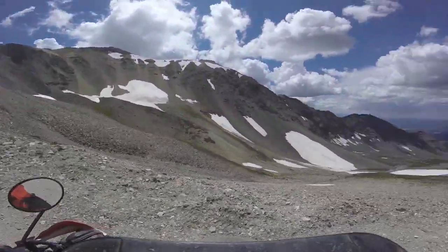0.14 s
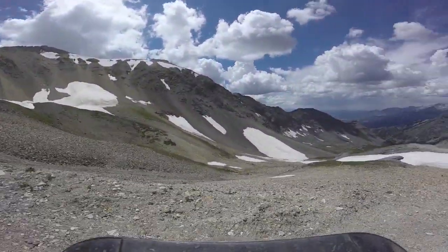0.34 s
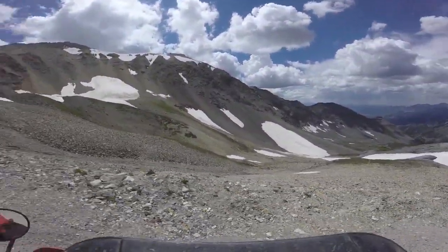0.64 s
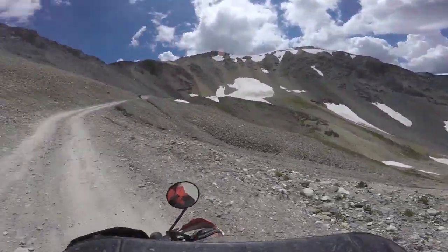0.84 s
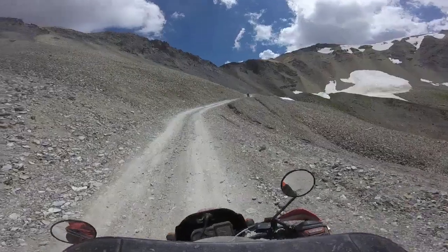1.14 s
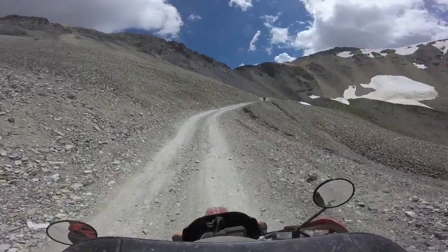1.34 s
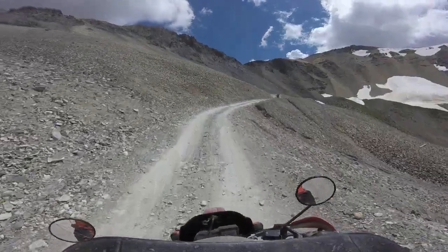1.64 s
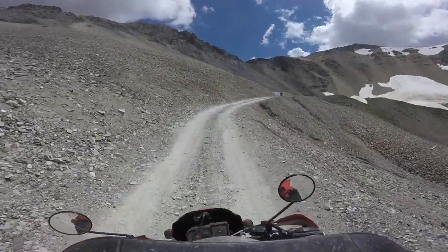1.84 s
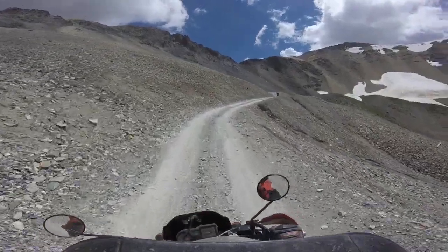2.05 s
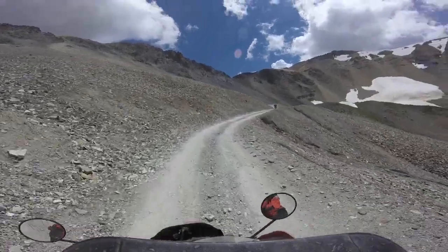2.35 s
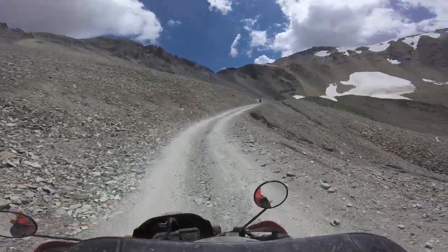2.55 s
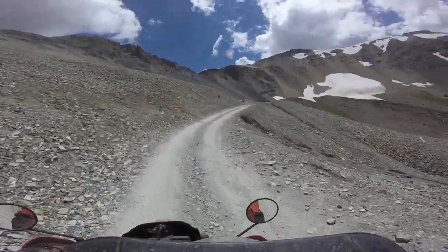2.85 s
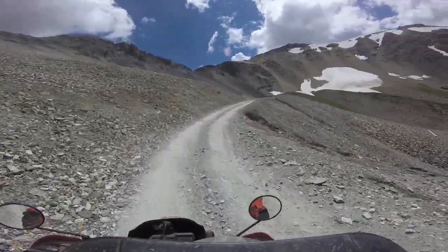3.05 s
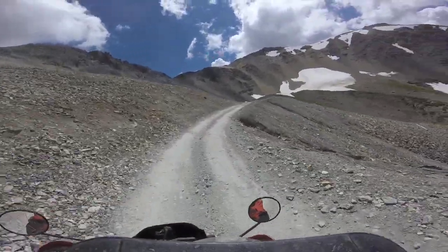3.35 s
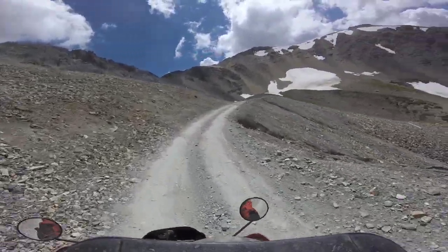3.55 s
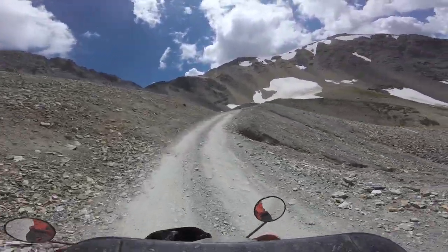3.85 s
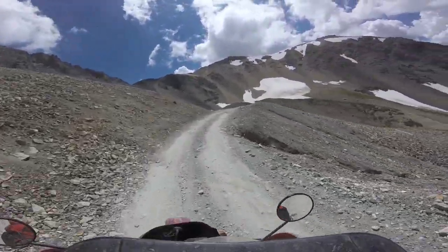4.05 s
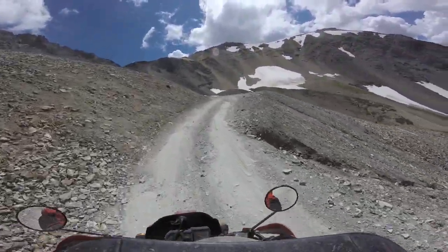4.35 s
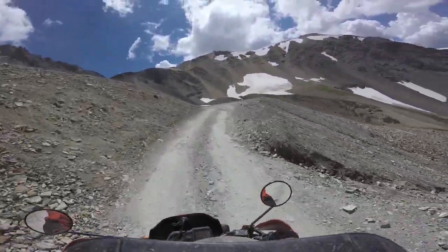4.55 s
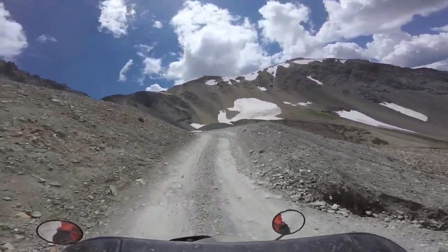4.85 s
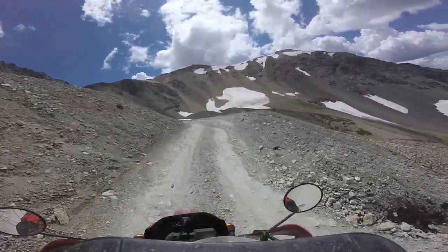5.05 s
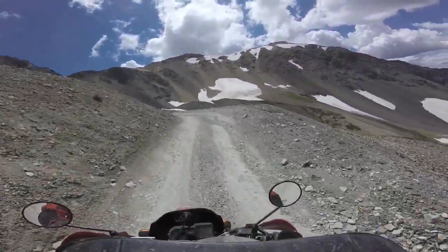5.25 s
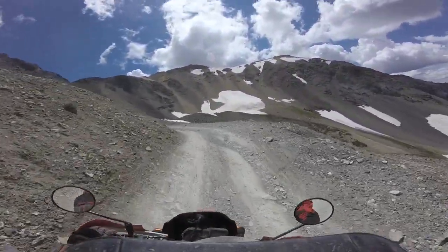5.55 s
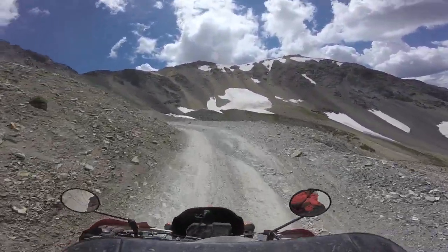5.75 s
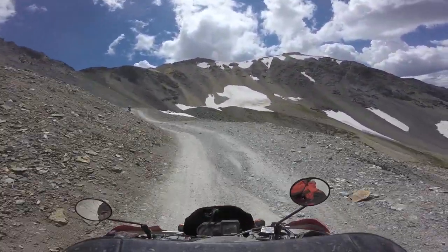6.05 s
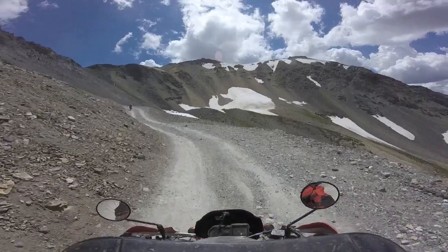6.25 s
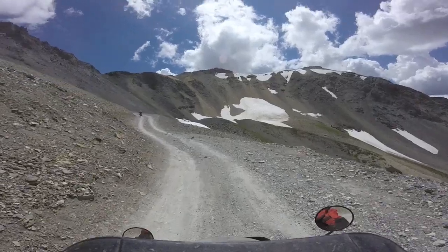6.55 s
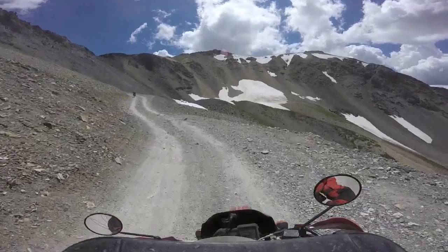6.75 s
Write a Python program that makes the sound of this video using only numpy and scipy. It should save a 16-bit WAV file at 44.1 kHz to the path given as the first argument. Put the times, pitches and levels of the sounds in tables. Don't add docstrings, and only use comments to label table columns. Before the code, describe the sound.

Close, slightly muffled helmet microphone outdoors: a double knock and rattle open over a steady throaty motorcycle engine. The tone shifts briefly as the head turns aside, then the engine pulls harder, wavering as the wheel slips. Gravel hiss, bursts of sprayed stones and low wind thrums run throughout, with sparse dry ticks. Finally stones crunch strongly and the engine slows, weakens and stumbles.

```python
import sys
import numpy as np
from scipy import signal
from scipy.io import wavfile
from scipy.ndimage import uniform_filter1d

SR = 44100
rng = np.random.default_rng(int(sys.argv[2]) if len(sys.argv) > 2 else 0)


def wrap_up_sound(samples):
    columns = np.atleast_2d(samples).T
    tamed = np.clip(columns, -1, 1)
    steps = np.round(tamed * 32767).astype(np.int16)
    wavfile.write(sys.argv[1], SR, steps)


def undo_db(level):
    steps = np.asarray(level, float) / 20
    return 10 ** steps


N = 304290
T = np.arange(N) / SR
FULL_LOAD_DB = -26

# t/s, firing rate/Hz
SPEED = [(0.0, 29.917), (0.5, 27.815), (1.0, 31.417), (1.9, 30.411), (2.3, 31.372), (2.6, 33.267),
         (3.3, 32.279), (3.9, 30.411), (4.4, 29.107), (4.9, 31.418), (5.4, 29.565), (6.2, 28.546),
         (6.45, 25.987), (6.7, 24.894), (6.9, 21.153)]
# t/s, silencer ring level/dB
LOAD = [(0, -33), (1.0, -31), (1.27, -28), (1.5, -32), (1.65, -29.5), (2.05, -25), (2.65, -26),
        (3.55, -28.5), (3.85, -33), (4.03, -31), (4.16, -39), (4.32, -32.5), (4.72, -28.5), (5.12, -35.5),
        (5.35, -31.5), (5.9, -32.5), (6.25, -38.5), (6.9, -56)]
# t/s, share/1
TURN = [
    (0, 0.14),
    (.11, 0.26),
    (.2, 0.82),
    (.55, 1),
    (.86, 0.54),
    (.98, 0.15),
    (6.9, 0.0044),
]


def engine():
    first_turn = .3114 - .03
    speed_hz = firing_rate()
    turns = np.cumsum(speed_hz) / SR - first_turn
    at = np.flatnonzero(np.diff(np.floor(turns)) > 0)
    stumble = np.maximum(27.5 - speed_hz[at], 0)
    jitter_s = .0011 * stumble * rng.standard_normal(len(at))
    at = np.minimum(at + np.round(SR * jitter_s).astype(int), N - 1)
    lag_s = abs(0.001085 + .00006 * rng.standard_normal(len(at)))
    late = at + np.round(SR * lag_s).astype(int)
    per_cycle = np.sqrt(SR / 30)
    exhaust = exhaust_pipe(at, stumble) + silencer(at, late) + outlet_jet(at, late)
    return per_cycle * exhaust + valve_gear(turns) + frame_hum(turns)


def firing_rate():
    spread_s = .05
    # t/s, firing rate gained/Hz
    slips = [(0.45, 1.33), (0.74, -0.6), (0.87, -1.58), (0.99, -1.88), (1.17, -1.28), (1.27, -1.78),
             (1.56, -1.96), (1.85, -0.61), (2.46, 1.34), (2.69, -1.05), (3.01, -1.15), (3.31, -0.7),
             (3.86, 2.15), (4.12, 2.61), (4.48, 0.71), (4.9, -1.31), (5.05, 0.94), (5.23, -0.61),
             (5.3, -0.52), (5.54, 1.34)]
    return curve(SPEED) + sum(gain * np.exp(-.5 * ((T - s) / spread_s) ** 2) for s, gain in slips)


def pipe_db():
    full_db, share, lag_s = -33, 0.38, .3
    bog_gain_db = np.maximum(25 - curve(SPEED), 0)
    slow_load_db = uniform_filter1d(curve(LOAD) - FULL_LOAD_DB, round(lag_s * SR), mode="nearest")
    return full_db + bog_gain_db + share * slow_load_db


def exhaust_pipe(at, stumble):
    # f/Hz, width/Hz, level/dB, polarity at the outlet/1
    pipe_modes = [(130, 44, -5, 0.013), (158.8, 41.4, 0.5, -0.77), (264.9, 21.2, -2, -1.17),
                  (295, 44.6, 2, -0.74), (442.6, 60.6, 4.5, -0.61), (631.3, 28, -10.5, 0.8),
                  (828, 69, -1.5, 0.83)]
    push = np.zeros(N + 200)
    weak_db = -.6 * stumble * abs(rng.standard_normal(len(at)))
    push[at] = undo_db(pipe_db()[at] + weak_db)
    t = T[:200]
    pipe = signal.fftconvolve(rings(pipe_modes), t * np.exp(-t / 0.00012))
    return undo_db(-0.5) * strike(push, pipe)


def silencer(at, late):
    # f/Hz, width/Hz, level/dB, polarity/1
    shell_modes = [(1249.6, 171, 2, 0.89), (1357.6, 73, -4, -1.144), (1558, 94, -9, -0.96),
                   (1549, 71, -5, 1), (1570, 110, -8.5, -1.1)]
    turn = curve(TURN)
    blow = np.zeros(N + 200)
    ring_db = (curve(LOAD) - 4 * turn)[at]
    blow[late] = undo_db(ring_db + 0.13 * rng.standard_normal(len(at)))
    blow[late + 100] = -turn[at] * blow[late]
    direct = rings(shell_modes)
    answer = direct.copy()
    answer[268:] += 0.082 * direct[:-268]
    flow = strike(blow, exhaust_gate()) * rng.standard_normal(N)
    shaken = strike(flow, rings([(1324, 37.5, 0, 1)]))
    return undo_db(-0.5) * strike(blow, answer) + undo_db(-11.0) * shaken


def outlet_jet(at, late):
    # f/Hz, width/Hz, level/dB
    jet_modes = [(1618, 267, -8), (1922, 125, -0.5), (2332, 162, -4), (2985, 246, -12.5),
                 (3820, 250, -17.5), (4440, 330, -25.5), (6180, 780, -21)]
    full_db, load_share, aside_db = -36, .7, 5
    puff_db = full_db + load_share * (curve(LOAD) - FULL_LOAD_DB) + aside_db * curve(TURN)
    puff = np.zeros(N + 200)
    puff[late] = undo_db(puff_db[at] + 0.8 * rng.standard_normal(len(at)))
    flow = strike(puff, exhaust_gate()) * rng.standard_normal(N)
    outlet = rings([(hz, width, db + 20 * np.log10(width), (-1) ** k)
                    for k, (hz, width, db) in enumerate(jet_modes)])
    t = T[:60]
    outlet = signal.fftconvolve(outlet, t * np.exp(-t / .00003))
    return undo_db(-1.5) * strike(flow, outlet)


def exhaust_gate():
    t = T[:2048]
    return (1 - np.exp(-t / 0.00053)) * (np.exp(-t / 0.0058) + 0.076 * np.exp(-t / 0.0031))


def valve_gear(turns):
    # f/Hz, density/dB
    whirr = [(1500, -32.5), (3500, -8.5), (4500, 2), (5300, -1), (6200, 5), (7000, -4), (9000, -5.5),
             (10000, -15), (12500, -22.5), (15000, -36.5), (16000, -62)]
    level_db = -52.5 + 0.87 * (pipe_db() + 29)
    cycle = turns % 1
    slow = 0.85 * np.exp(-cycle / 0.85)
    quick = (0.64 + 1.4 * curve(TURN)) * np.exp(-cycle / 0.085)
    swell = .5 + (1 - np.exp(-cycle / 0.018)) * (slow + quick)
    return undo_db(level_db) * swell * noise(whirr, size=256, patchy_db=3.5, bins=4, frames=6)


def frame_hum(turns):
    # t/s, level/dB, spread/s
    hum = [
        (.8, -47.5, .5),
        (1.85, -41.5, 0.31),
        (2.68, -44.5, 0.25),
        (4.4, -47.5, 0.11),
        (5.3, -52.5, .45),
    ]
    return swells(hum) * np.sqrt(2) * np.sin(2 * np.pi * (8 * turns + 0.52))


def gravel():
    # f/Hz, density/dB
    rolling = [(80, -10), (150, -14), (300, 5), (700, -13), (1000, -3), (1330, 6.5), (1700, -0.5),
               (2200, 0), (2600, -12), (3500, -34.5), (5000, -49), (9000, -104)]
    # f/Hz, density/dB
    hiss = [(900, -29), (1350, 16), (1900, 9.5), (2550, 10), (3000, 10), (3750, 3.5), (4200, -8.5),
            (5300, -22.5), (6300, -4), (7200, -20.5), (9500, -34), (12000, -54.5), (15000, -88)]
    # t/s, level/dB, spread/s
    stone_patches = [(1.0, -45, 0.02), (1.68, -49, 0.069), (2.85, -51, 0.13), (3.1, -42, 0.095),
                     (3.32, -45.5, 0.085), (3.82, -45.5, 0.13), (4.22, -48, .12), (4.55, -56, 0.076),
                     (5.18, -45.5, 0.052), (5.74, -45, 0.091), (6.33, -49, 0.056), (6.48, -33.5, 0.024),
                     (6.54, -37, 0.038), (6.7, -54, 0.0084)]
    stones_hz = 400
    stones = undo_db(5.5 * np.minimum(rng.exponential(1, N), 5)) * (rng.random(N) < stones_hz / SR)
    t = T[:600]
    grain = (1 - np.exp(-t / 0.00081)) * np.exp(-t / 0.0038)
    crunch = evened(signal.oaconvolve(stones, grain)[:N])
    road_db = -39 + 0.1 * (curve(LOAD) - FULL_LOAD_DB)
    road = undo_db(road_db) * noise(rolling, size=512, patchy_db=2.0, bins=6, frames=16)
    steady_db = -44.5 + 0.15 * (curve(SPEED) - 26) - 4 * curve(TURN)
    level = undo_db(2.0) * (undo_db(steady_db) + swells(stone_patches))
    spray = noise(hiss, size=512, patchy_db=2.0, bins=6, frames=16) * (0.58 + 0.26 * crunch)
    return road + level * spray


def wind():
    # t/s, level/dB, spread/s
    gusts = [(.09, -33.5, 0.017), (.29, -32.5, 0.064), (.52, -35, 0.014), (.61, -45, 0.019),
             (.79, -25.5, 0.037), (1.01, -35, 0.036), (1.6, -37.5, 0.11), (1.94, -28.5, 0.015),
             (2.09, -42, 0.049), (2.32, -34, 0.068), (2.56, -32.5, 0.048), (2.72, -34, 0.07),
             (2.93, -33, 0.016), (3.05, -27, 0.067), (3.19, -27, 0.01), (3.31, -28.5, 0.035),
             (3.42, -34, 0.028), (3.76, -30.5, 0.014), (3.92, -34.5, 0.073), (4.04, -34, 0.017),
             (4.2, -40, 0.044), (4.7, -37.5, 0.036), (4.87, -41, .05), (5.1, -32, 0.026), (6.06, -45, 0.1),
             (6.3, -35.5, 0.026), (6.52, -29, 0.067), (6.66, -31.5, 0.021), (6.785, -34, 0.011),
             (6.87, -36, 0.01)]
    # f/Hz, density/dB
    buffet = [(6, 3.5), (15, -12), (24, -12), (36, -10), (50, 12.5), (62, -0.5), (76, 11.5), (98, -21.5),
              (140, -10.5), (200, -14.5), (320, -60.5), (900, -100)]
    airflow_db = -43.5
    thrum = noise(buffet, size=8192, patchy_db=4, bins=3, frames=3)
    steadied = thrum / (uniform_filter1d(thrum ** 2, 1800) + .1) ** .35
    return (undo_db(airflow_db) + swells(gusts)) * evened(steadied)


def loose_parts():
    # t/s, level/dB, contact/s, tilt/dB per octave
    ticks = [
        (1.6487, -16, 0.0016, 1),
        (3.6947, -15.5, 0.0011, -2.5),
        (4.1091, -32, 0.00069, 0),
        (4.374, -23.5, 0.0007, -0.5),
        (5.457, -29, 0.00072, -4),
        (5.5738, -21.5, 0.0012, 0),
    ]
    rattles = [
        (0.0004, -17, 0.00083, -2),
        (0.0034, -18.5, 0.0054, -1),
        (3.7446, -22, 0.001, -1.5),
        (3.7504, -27.5, 0.0018, -2.6),
        (4.4248, -23.5, 0.002, -0.79),
        (4.4297, -36, 0.0018, -1.7),
        (5.6099, -22, 0.0021, -1.2),
        (5.614, -26.5, 0.0034, -1.5),
        (5.6184, -28, 0.0016, -1.5),
    ]
    knocks = [
        (0.0074, -12, 0.0016, -0.36),
        (4.1472, -13, 0.0025, -0.27),
        (6.8688, -18.5, 0.0011, -0.4),
    ]
    # f/Hz, level/dB, t60/s
    tick_modes = [(1534, 11.5, 0.016), (2670, -30, 0.0056), (4000, 0, 0.0088), (4550, -6, 0.006),
                  (5400, -19, 0.0052), (5950, 2, 0.0094), (7980, -10.5, 0.0091), (11250, -15, 0.0039),
                  (11450, -13, 0.0061)]
    rattle_modes = [(2100, 12, 0.013), (2793, 0.5, 0.044), (3630, 4.5, 0.0093), (4370, -4, 0.021),
                    (4770, -53, 0.0044), (6150, -12, 0.0088), (7650, -9, 0.0071), (12200, -12, 0.0059)]
    knock_modes = [(1410, -7.5, 0.07), (2266, -2, 0.028), (2680, 3, 0.0069), (3630, -18, 0.016),
                   (4900, -27, 0.015), (6060, -13, 0.0089), (7010, -19, 0.014), (11900, -25, 0.004)]
    # level/dB, low f/Hz, high f/Hz
    tick_snap = (-16, 2700, 6400)
    rattle_snap = (-6.5, 3600, 5300)
    knock_snap = (-15, 2100, 6100)
    out = clicks(ticks, tick_modes, tick_snap)
    out += clicks(rattles, rattle_modes, rattle_snap)
    return out + clicks(knocks, knock_modes, knock_snap)


def clicks(blows, modes, snap):
    snap_db, low_hz, high_hz = snap
    snap_decay_s = 0.0023
    snap_band = signal.butter(3, (low_hz, high_hz), "band", fs=SR)
    out, t = np.zeros(N), T[:2048]
    for s, db, contact_s, tilt_db in blows:
        grit = rng.standard_normal(len(t))
        ring = sum(undo_db(d + tilt_db * np.log2(hz / 3000) - 60 * t / t60) * np.sin(2 * np.pi * hz * t)
                   for hz, d, t60 in modes)
        ring = ring * (1 - np.exp(-t / .00015))
        contact = grit * t * np.exp(-3 * t / abs(contact_s))
        contact[round(SR * abs(contact_s) / 3)] = 1.04 * np.linalg.norm(contact)
        sound = signal.fftconvolve(contact, ring)[:len(t)]
        burst = grit[::-1] * (1 - np.exp(-t / 0.00011)) * np.exp(-t / snap_decay_s)
        crack = signal.lfilter(*snap_band, burst)
        sound = sound / abs(sound).max() + undo_db(snap_db) * crack / abs(crack).max()
        add(out, s, undo_db(db + 4) * sound)
    return out


def evened(x):
    return x / np.sqrt(np.mean(x ** 2) + 1e-20)


def read(points, hz):
    f, value = np.transpose(points)
    return np.interp(np.log(hz + 1), np.log(f + 1), value)


def curve(table):
    rows = np.array(table)
    return np.interp(T, rows[:, 0], rows[:, 1])


def swells(rows):
    return sum(undo_db(db) * np.exp(-.5 * ((T - s) / spread) ** 2) for s, db, spread in rows)


def add(mix, s, sound):
    part = mix[max(round(s * SR), 0):][:len(sound)]
    part += sound[:len(part)]


def rings(modes):
    t = T[:4096]
    return sum(sign * undo_db(db) * np.exp(-np.pi * width * t) * np.sin(2 * np.pi * hz * t)
               for hz, width, db, sign in modes)


def strike(drive, answer):
    return signal.oaconvolve(drive, answer / np.linalg.norm(answer))[:N]


def noise(spectrum, size, patchy_db, bins, frames):
    hz = np.fft.rfftfreq(size, 1 / SR)
    a, b, patches = rng.standard_normal((4 * N // size + 6, len(hz), 3)).T
    patches = uniform_filter1d(uniform_filter1d(patches, bins, 0), frames, 1)
    level_db = read(spectrum, hz)[:, None] + patchy_db * evened(patches)
    z = (a + 1j * b) * undo_db(level_db)
    return evened(signal.istft(z, nperseg=size, noverlap=size * 3 // 4)[1][:N])


def scene():
    return (engine() + gravel() + wind() + loose_parts())[None]


def low_pass(x):
    return signal.sosfilt(signal.butter(12, 15100, fs=SR, output="sos"), x)


def record(dry):
    # f/Hz, density/dB
    self_noise = [(3000, -18), (8000, 5), (12500, -2), (15000, -10.5), (16000, -33)]
    self_noise_db = -74
    muffled = signal.sosfilt(signal.butter(4, 12000, fs=SR, output="sos"), dry)
    muffled = signal.lfilter(*signal.butter(1, 8, "high", fs=SR), muffled)
    muffled += undo_db(self_noise_db) * noise(self_noise, size=512, patchy_db=4.5, bins=6, frames=16)
    return low_pass(muffled)


dry = scene()
out = record(dry)
wrap_up_sound(out)
```